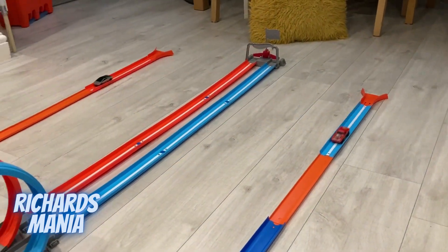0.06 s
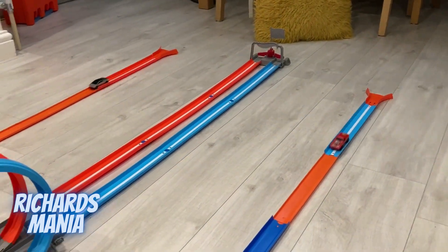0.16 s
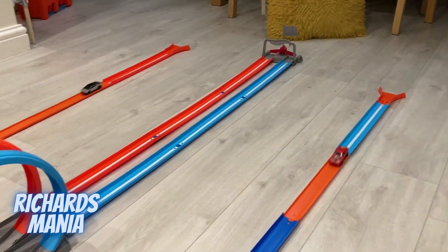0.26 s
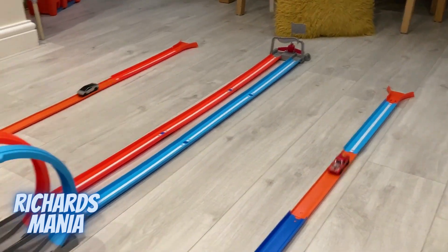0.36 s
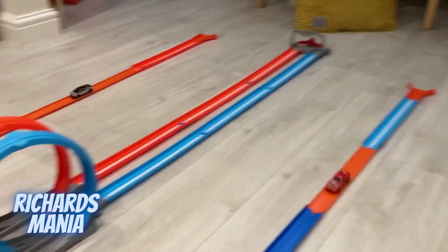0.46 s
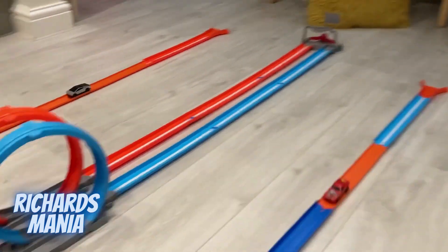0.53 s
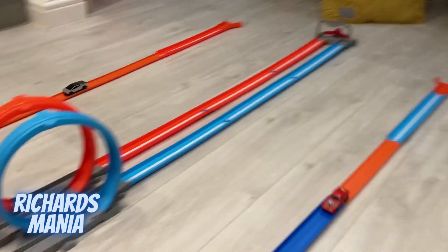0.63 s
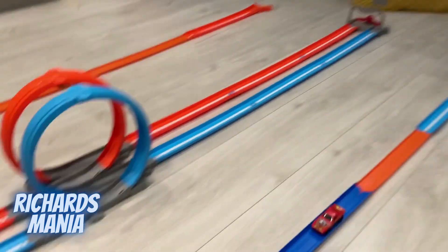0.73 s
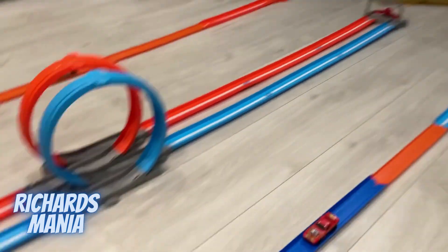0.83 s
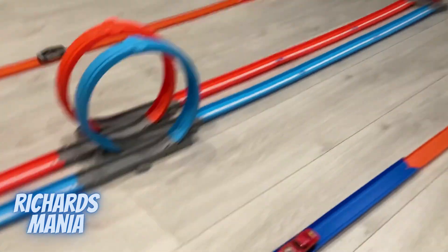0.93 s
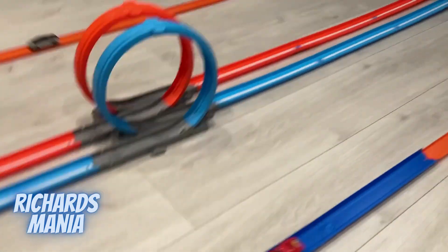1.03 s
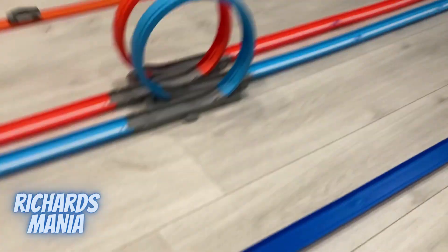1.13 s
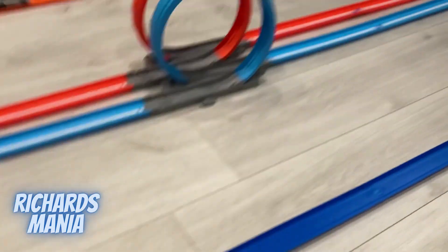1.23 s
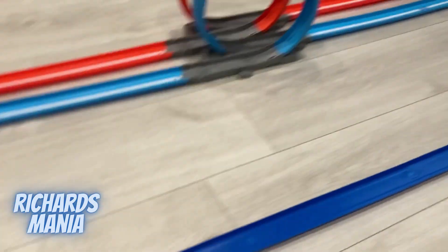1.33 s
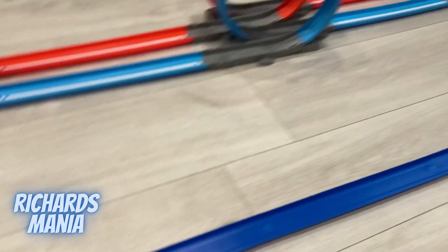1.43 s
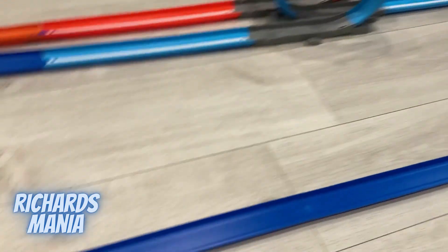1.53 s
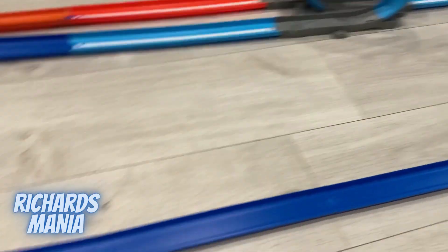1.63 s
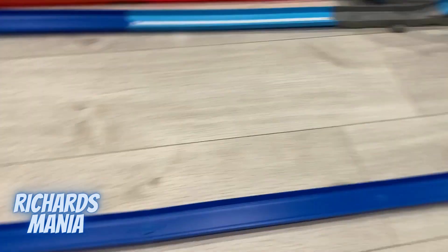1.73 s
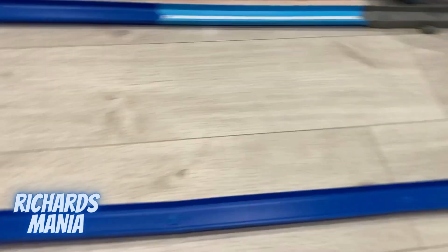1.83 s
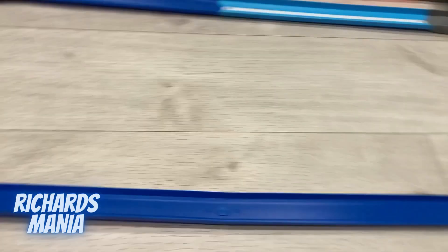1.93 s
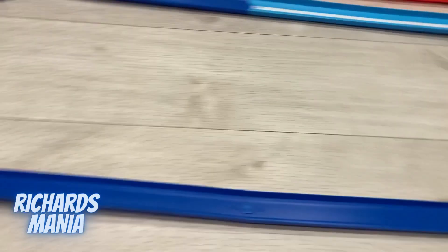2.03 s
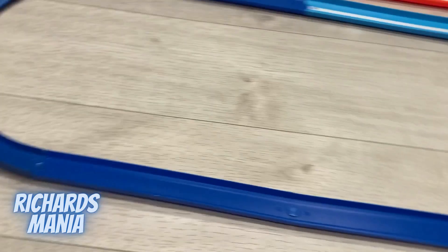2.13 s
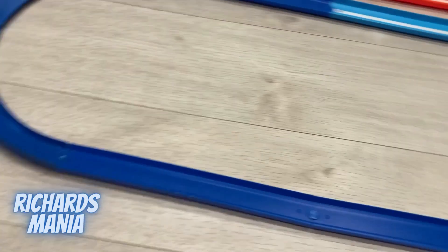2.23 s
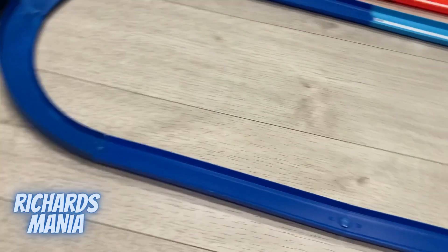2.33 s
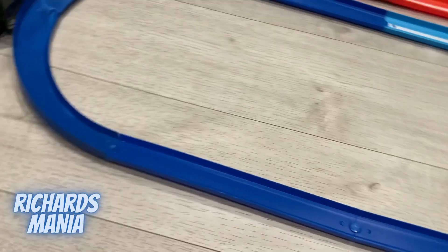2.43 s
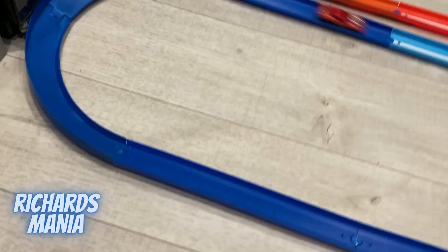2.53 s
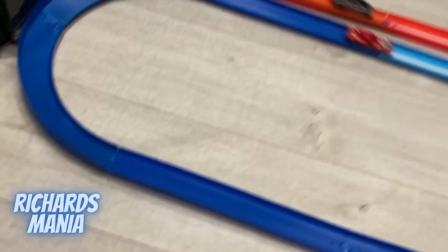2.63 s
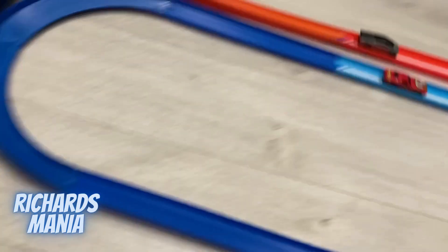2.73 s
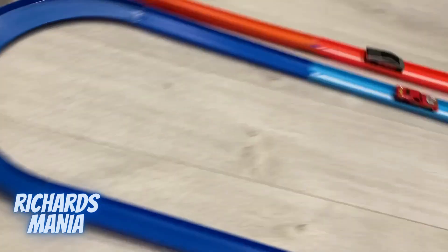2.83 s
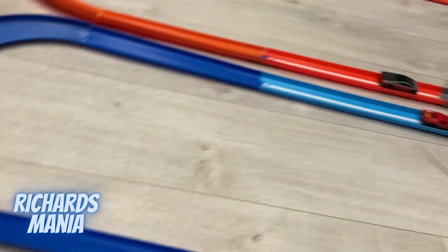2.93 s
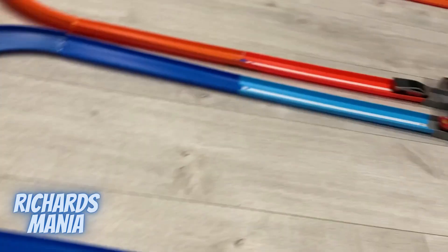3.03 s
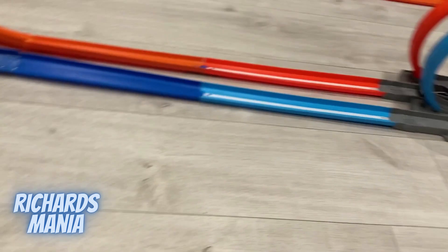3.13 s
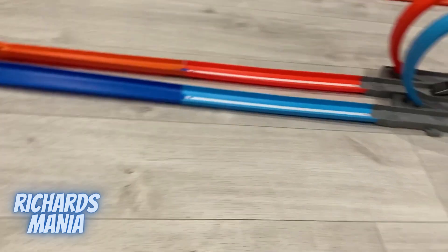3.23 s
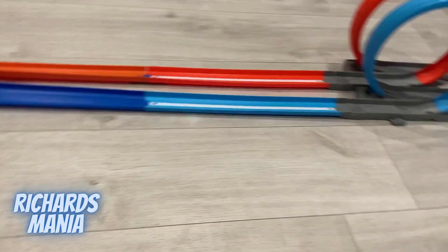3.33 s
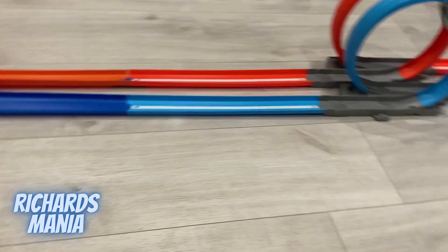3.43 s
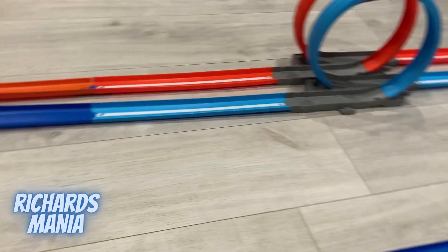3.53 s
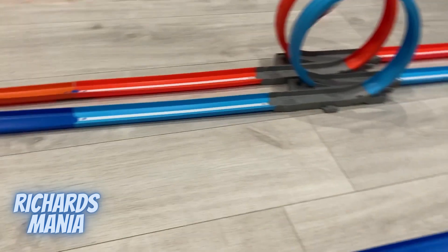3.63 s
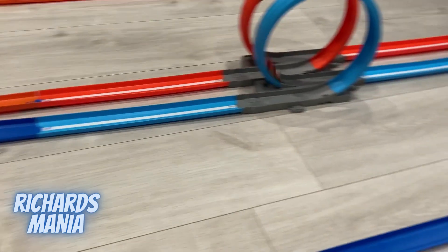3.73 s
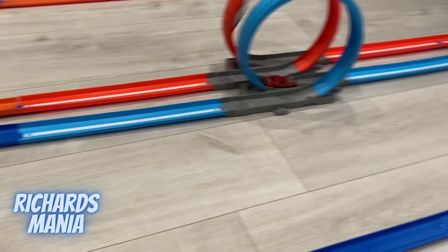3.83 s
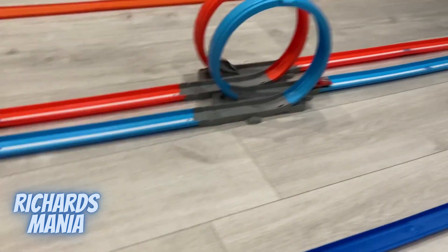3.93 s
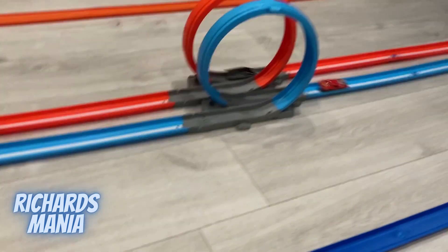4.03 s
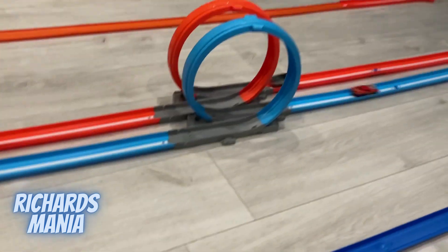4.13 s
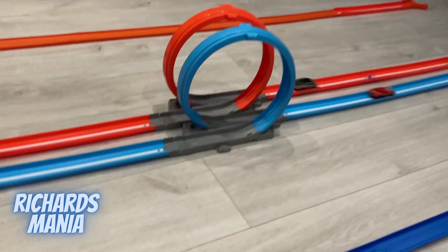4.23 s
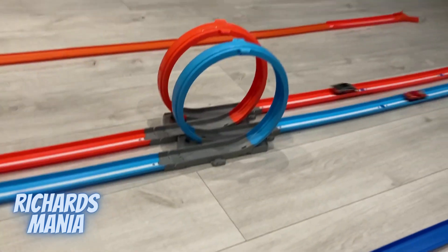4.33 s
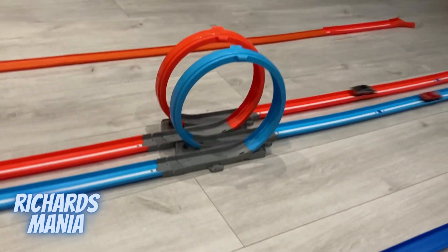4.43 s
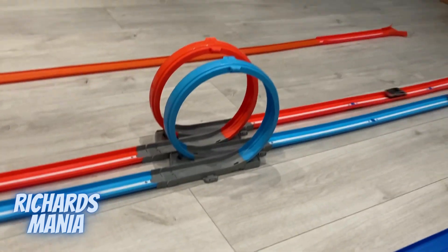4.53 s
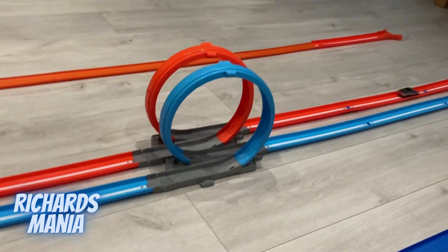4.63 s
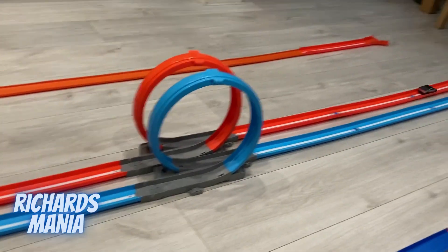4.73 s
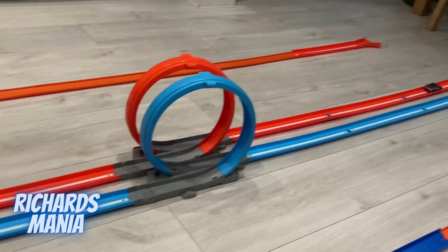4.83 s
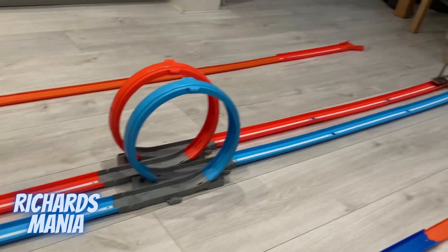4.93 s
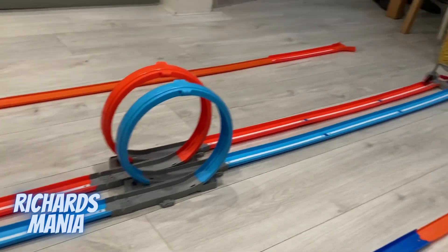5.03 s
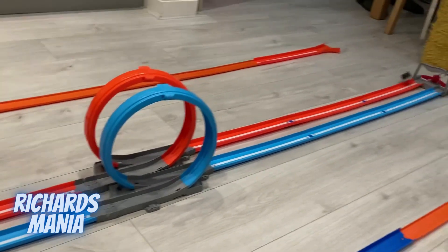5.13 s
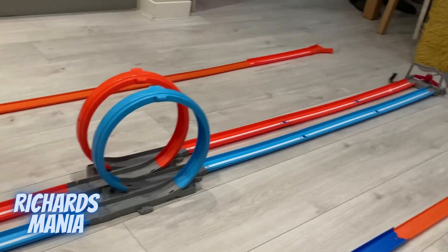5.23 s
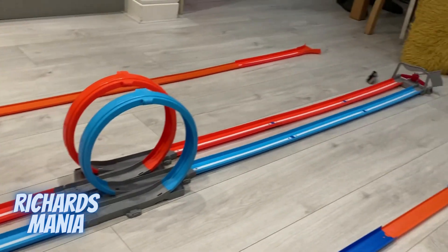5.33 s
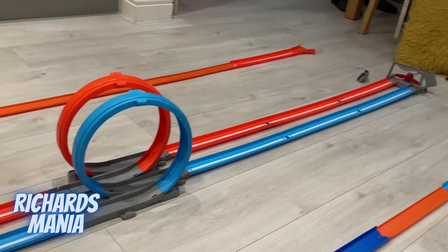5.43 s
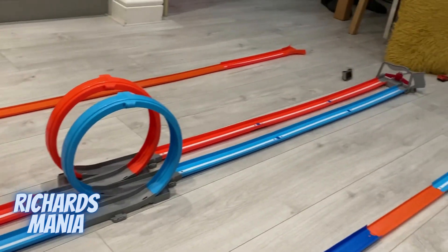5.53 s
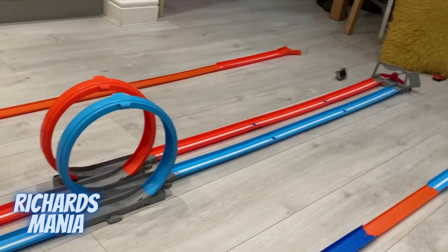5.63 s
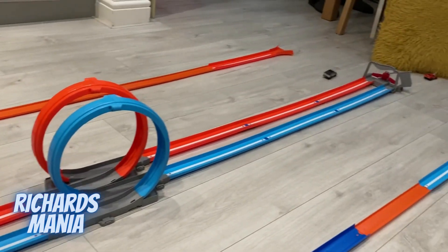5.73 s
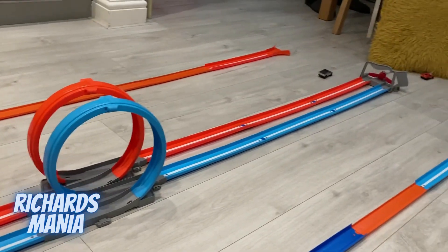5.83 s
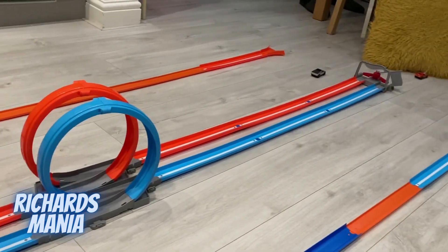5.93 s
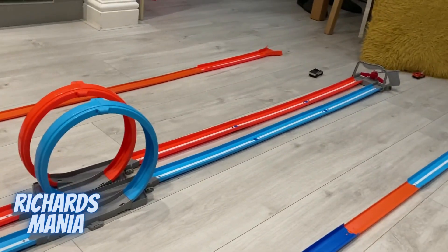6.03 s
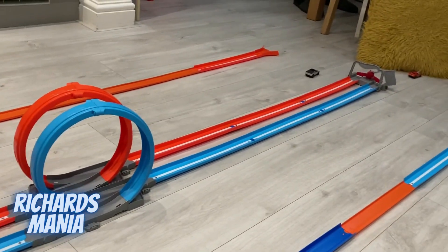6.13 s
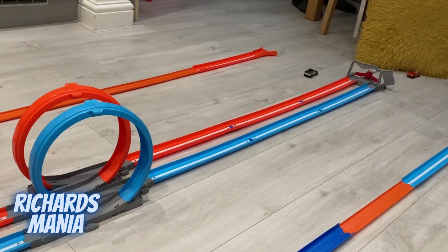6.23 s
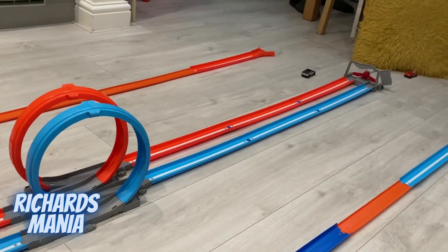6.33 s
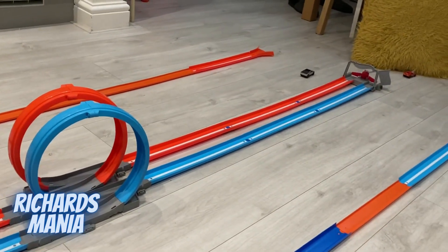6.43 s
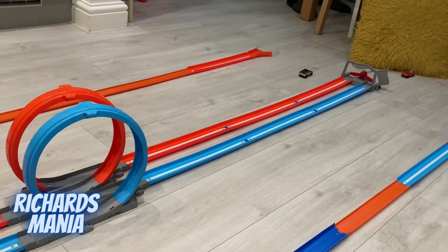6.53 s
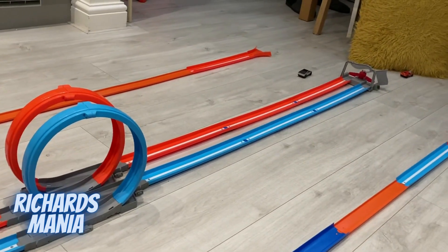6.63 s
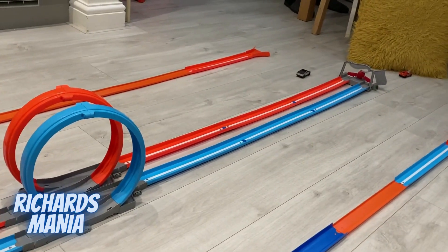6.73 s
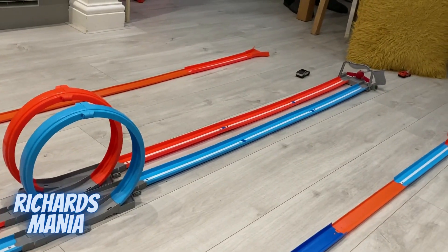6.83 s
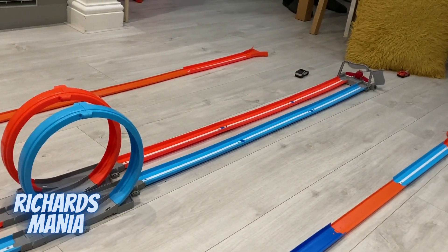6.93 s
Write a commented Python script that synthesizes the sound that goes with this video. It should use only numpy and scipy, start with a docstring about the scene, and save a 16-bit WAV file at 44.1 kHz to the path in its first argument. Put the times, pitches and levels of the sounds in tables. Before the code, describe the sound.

In a moderately echoing living room with a hard floor, two small metal toy cars run on plastic track. From 0 s a thin, gritty wheel rumble carries sharp joint clicks, near 0.25, 0.8 and 1.2 s. At about 1.7 s a car strikes and scrapes the bend's side rail, and the rolling gets fuller, with frequent clacks until 3 s. A dense burst of hollow plastic slaps and roar fills 3.1-3.3 s as the first car loops; a second comes at 3.8-4.1 s. Rattling continues, thinning, to two hard gate crashes at 4.86 and 4.98 s, with flap knocks and rebounds. One car tumbles, with knocks and a scuff at 5.1-5.5 s, then drops in a quick clatter at 5.8-5.95 s. The echo dies swiftly, leaving faint room hush to about 7 s. The close handheld stereo microphone adds slight low handling rumble.

```python
"""Hard wheels rumble along a plastic track and clack over its joints: two die-cast toy cars race indoors.
Each roars through a loop and crashes into the finish gate; one tumbles on, drops back on its wheels,
and the laminate-floored living room falls silent. Rolling is a stream of random taps and a knock is a
burst of contacts; both excite banks of damped resonances. Diffuse, decaying noise gives the echo, and
filtered noise the still room and the handling rumble."""
import sys
import numpy as np
from scipy import signal
from scipy.fft import rfft, irfft, next_fast_len
from scipy.io import wavfile

SR = 44100
rng = np.random.default_rng(int(sys.argv[2]) if len(sys.argv) > 2 else 0)


def file_out(sig):
    """Save sig as 16-bit WAV at sys.argv[1]."""
    # one column per channel
    cols = np.atleast_2d(sig).T
    # limit, then scale
    lim = np.clip(cols, -1, 1)
    pcm = np.round(lim * 32767).astype(np.int16)
    wavfile.write(sys.argv[1], SR, pcm)


N = 307377
TIME = np.arange(N) / SR

# Resonances: (frequency [Hz], bandwidth [Hz], level [dB])
FLOOR = [(72, 32, 1.5), (120, 38, 3), (156, 53, 2), (212, 78, -2.5), (287, 79, -5), (468, 55, -5)]
# track base: (frequency [Hz], bandwidth [Hz], level [dB])
BASE = [(501.5, 48, -4), (586.5, 56, 1.5), (673, 110, 0), (793, 104, 3), (963, 79, 3)]
# running strip: (frequency [Hz], bandwidth [Hz], level [dB])
STRIP = [(1013.6, 40, 5), (1100, 199, 5.5), (1215, 470, 1), (1540, 210, -5)]
# side rails: (frequency [Hz], bandwidth [Hz], level [dB])
RAILS = [(1718, 240, 1), (2048, 200, 3), (2186, 100, 4.5), (2320, 180, 2.5), (2565, 780, -3.5)]
# metal chassis: (frequency [Hz], bandwidth [Hz], level [dB])
CHASSIS = [(2975, 190, 0.63), (3490, 400, 3), (3676, 258, 5), (4100, 400, 2.8), (5202, 240, 6)]
# car sill: (frequency [Hz], bandwidth [Hz], level [dB])
SILL = [(3224, 290, -3), (3590, 640, 2), (3810, 240, 6)]
# axles: (frequency [Hz], bandwidth [Hz], level [dB])
AXLES = [(5164, 200, 4.5), (5760, 600, -2.5), (6377, 100, 7.5), (7130, 644, 1), (7553, 180, -2.5),
         (8530, 230, -2.5), (9497, 58, 6)]
# the hard contact itself: (frequency [Hz], bandwidth [Hz], level [dB])
CRACK = [(6900, 2700, 0.0076), (8600, 340, 0.0019)]
# hollow frame of the finish gate: (frequency [Hz], bandwidth [Hz], level [dB])
GATE_FRAME = [(129, 52, -4), (159, 28, 9.5), (240, 70, -8), (342.6, 68, -7.5)]
# swinging flap of the gate: (frequency [Hz], bandwidth [Hz], level [dB])
FLAP = [(518, 61, -3.5), (607, 18, 5.5), (766, 60, -3.5), (917, 77, 2), (1170, 41, -2)]

# Rolling strength before each part's exponent: (time [s], level [dB])
ROLL = [(0, -3), (.3, -5), (.55, -3.5), (.8, -2.5), (1.3, -0.7), (1.62, -1.5), (2.2, -0.5), (2.65, -1.5),
        (2.95, -1), (3.1, 1.5), (3.45, -2.5), (4.3, -2), (4.8, -3.5), (5.0, 0), (5.15, -7), (5.48, -6.5),
        (5.62, -16.5), (5.79, -14.5)]
# plain rolling in each part: part -> level [dB]
ROLL_DB = dict(floor=-50, base=-41.5, strip=-38.5, rails=-39, chassis=-36, axles=-32)
# how steeply each part follows the rolling strength: part -> exponent [1]
ROLL_EXPONENT = dict(floor=0.87, base=1, strip=0.97, rails=1.2, chassis=1.39, axles=1.3)

# Stretches of firmer pressing, each followed by its drive into the parts.
# wheels graze the side rails: (start [s], length [s], level [dB], extra level in the rails [dB])
GRAZES = [(1.26, 0.44, -1, -6.5), (1.822, 0.36, -2.5, -4), (3.68, .1, -3.5, 6.5), (4.857, 0.045, -8, 1.5)]
# part -> level [dB]
GRAZE_DB = dict(chassis=-38, rails=-35)
# cars come down the first straight: (start [s], length [s], level [dB])
STRAIGHTS = [(.25, .55, -6), (.85, .62, -7)]
# part -> level [dB]
STRAIGHT_DB = dict(floor=-50.5, strip=-38, rails=-39.5)
# a chassis scrapes along the rail of the bend: (start [s], length [s], level [dB])
SCRAPES = [(1.698, 0.062, -3), (1.765, 0.032, -1), (1.81, 0.098, -7.5)]
# part -> level [dB]
SCRAPE_DB = dict(rails=-33, sill=-34, axles=-29.5)
# the bend drums on the floor under each car: (start [s], length [s], level [dB])
BENDS = [(1.72, 0.44, -2.5), (2.1, 0.48, -7)]
# part -> level [dB]
BEND_DB = dict(floor=-42.5, base=-41, strip=-40.5, chassis=-44.5)
# loops roar: (start [s], length [s], level [dB], extra level in the strip [dB])
LOOPS = [(3.156, 0.12, -1.5, 2.5), (3.392, 0.51, -6, 1), (3.866, 0.19, -2.5, -0.5), (4.06, 0.27, -11, -3.5)]
# part -> level [dB]
LOOP_DB = dict(floor=-42, base=-30.5, rails=-31, chassis=-38)
# gate and flap shake after each car: (start [s], length [s], level [dB])
SHAKES = [(4.86, 0.13, -12), (4.985, .025, -11)]
# part -> level [dB]
SHAKE_DB = dict(floor=-42.5, base=-26.5, strip=-33, rails=-27.5, chassis=-28, axles=-33, flap=-25)
# the tumbling car scuffs along the floor: (start [s], length [s], level [dB])
SCUFFS = [(5.26, 0.11, 0)]
# part -> level [dB]
SCUFF_DB = dict(floor=-42.5, base=-50, chassis=-39)

# Knocks, each kind followed by its reach into the parts. Chatter times are stretched by each part's linger.
# wheels clack over joints: (time [s], level [dB], weight [dB], snap [dB])
JOINTS = [(.246, -1.5, 1, 1.5), (.804, -5, -8, 1), (.899, -14, -8, 2), (.964, -8.5, 11.5, -3),
          (1.173, -1, 2, 3.5), (1.222, -12, 5.5, 5), (1.284, -12, -4, 2), (1.381, -4, 1, -9),
          (1.506, -2.5, -15, 0.5), (1.657, -11, 1.5, 5), (1.907, -8.5, -4, 9), (1.942, 2.5, 1, -1),
          (2.025, -2, 2.5, 2), (2.049, -9.5, 4.5, 1.5), (2.18, -3, -4, -6), (2.241, -1.5, -1, 0.5),
          (2.391, -3.5, 6, -1), (2.449, -16.5, 7, 1), (2.492, -14, 9, -1.5), (2.55, -6.5, 6.5, -2),
          (2.584, 1, 1.5, -3.5), (2.746, -1.5, 2.5, -6), (2.799, -2.5, 6, -3), (2.885, 0.5, 3.5, -1.5),
          (2.964, -8.5, 5.5, 2), (3.026, 0.5, 0, 4.5), (4.127, -2, 4.5, 3.5), (4.157, -1, 4, -17),
          (4.286, -5.5, -5.5, 3.5), (4.52, -8, 13, 1.5)]
# part -> level [dB]
JOINT_DB = dict(floor=-21.5, base=-11.5, strip=-10.5, rails=-11, chassis=-7, axles=-0.5, crack=-12)
# a car's flank strikes the rail of the bend: (time [s], level [dB], weight [dB])
RAIL_HITS = [(1.71, 0, -4)]
# part -> level [dB]
RAIL_HIT_DB = dict(floor=-13, base=-22, strip=1.5, rails=-5, chassis=0.5, sill=4.5, axles=-6, crack=-3)
# cars slap the hollow foot of the loops: (time [s], level [dB], weight [dB], snap [dB], chatter [s])
SLAPS = [(3.080, 6, -0.5, -4, 0.0011), (3.122, 1.5, 1, -11.5, 0.0028), (3.145, -6.5, 11, -3.5, 0.0036),
         (3.163, 5.5, 2, 4, 0.0018), (3.175, 3, 8.5, -1, 0.0014), (3.194, -7.5, 11, 1, 0.0028),
         (3.213, -7, 8.5, 0, 0.00088), (3.235, -10, 7, 1, .002), (3.256, -8.5, 7.5, 5, 0.0018),
         (3.264, -4, 5, 3.5, 0.00079), (3.293, -6.5, 10.5, -1, .0015), (3.799, 3, 3.5, -2, 0.0015),
         (3.823, 9, -2.5, -6, 0.0025), (3.837, 3.5, -2.5, -2.5, 0.0014), (3.859, 4, 5.5, -2.5, 0.00057),
         (3.886, -3, 4.5, -2.5, 0.00092), (3.944, -14, 7, 0, 0.0016), (3.965, 0, 9, 1.5, 0.0044),
         (3.988, -10, 7.5, 1, 0.0024), (4.0, -2, 10.5, 1, 0.0026), (4.037, -0.5, 3.5, 8, 0.0028),
         (4.055, -10, 1, 1, 0.0053), (4.092, -6, 9, 0, 0.0036), (4.182, -14, 8.5, -2.5, 0.0015)]
# part -> level [dB]
SLAP_DB = dict(floor=-22.5, base=-4, strip=-6.5, rails=-8.5, chassis=-6, axles=-3, crack=-17)
# cars slam into the gate: (time [s], level [dB], weight [dB], snap [dB], chatter [s])
GATE_BLOWS = [(4.856, 1, -5, 3.5, 0.00029), (4.953, -9, -5.5, -6, .002), (4.982, 6, 1, -0.5, 0.0011),
              (4.986, -3.5, 9.5, -0.5, .0008), (4.991, -2, 6, 0.5, 0.00069), (4.997, -4.5, 0.5, 5, .0015)]
# part -> level [dB]
GATE_BLOW_DB = dict(floor=-17, base=0, strip=-5.5, rails=-5, chassis=0, axles=0, crack=-14.5, frame=-10, flap=-4.5)
# a car tumbles and drops on its wheels: (time [s], level [dB], weight [dB], snap [dB], chatter [s])
TUMBLES = [(5.132, -8, -6, -4, .002), (5.21, -17.5, 4, 2, .001), (5.257, -5.5, 5, -6, 0.0013),
           (5.282, -22, 14, 0, 0.0027), (5.326, -1.5, -6.5, 7, 0.0011), (5.342, -6, 1, 1, 0.0016),
           (5.41, -10.5, -1, 1, .001), (5.512, -9.5, 1.5, 7.5, 0.003), (5.52, -9.5, -2, 3.5, .001),
           (5.808, -0.5, -2.5, -2, 0.00024), (5.816, -1.5, -10, -2, 0.0016), (5.831, -8, 1, -10, 0.0014),
           (5.854, -9.5, -6, -3, 0.0023), (5.889, -7, -3, 1, 0.0016), (5.935, -9, -3.5, 3.5, 0.0011)]
# part -> level [dB]
TUMBLE_DB = dict(floor=-7.5, base=-8.5, strip=-12, rails=-7.5, chassis=-5, axles=-4.5, crack=-10.5)
# the second car bounces between the gate's posts: (time [s], level [dB])
REBOUNDS = [(5.003, -2.5), (5.011, -4), (5.020, -10.5), (5.033, -6)]
# part -> level [dB]
REBOUND_DB = dict(base=-3, strip=-4.5, rails=-1.5, chassis=-4, axles=-7.5)
# the gate rocks and thuds on the floor: (time [s], level [dB])
THUDS = [(5.031, 0.5), (5.26, -4), (5.335, -7.5), (5.347, 1), (5.369, -7.5)]
# part -> level [dB]
THUD_DB = dict(floor=-9, frame=-10.5)
# the flap swings against its stop: (time [s], level [dB])
FLAP_KNOCKS = [(5.029, 6.5), (5.285, 2.5), (5.335, 1), (5.482, 1.5), (5.497, -7.5), (5.52, -17)]
# part -> level [dB]
FLAP_KNOCK_DB = dict(flap=-7, strip=-9.5)
# glancing touches, each exciting one resonance: (time [s], frequency [Hz], level [dB], T60 [s])
PINGS = [(.802, 5680, -16.5, 0.022), (.900, 5850, -22, 0.016), (.965, 1600, -16, 0.02),
         (1.741, 5370, -16, 0.013), (1.777, 3680, -13, 0.026), (2.046, 2360, -19, 0.04),
         (2.391, 3820, -20, 0.014), (2.448, 1180, -17, 0.043), (2.549, 1250, -27, 0.028),
         (3.031, 1540, -17.5, 0.035), (3.031, 2820, -16, .025), (3.122, 3410, -14, .02),
         (3.8, 1950, -12.5, .016), (3.802, 2380, -9, 0.02), (3.824, 2176, -6, 0.034),
         (3.824, 3560, -14, .025)]

# Direct gain; values above zero lower the echo by as much again: (time [s], level [dB])
NEARNESS = [(0, 0), (2.9, 2), (3.08, 0), (3.4, 2), (3.7, -2), (3.82, 3), (4.05, 2), (4.4, 1), (4.85, 0.5),
            (5.0, 2), (5.15, 2), (5.35, 0.5), (6.97, -1)]
# reverberation time: (frequency [Hz], T60 [s])
ROOM_T60 = [(140, 0.27), (280, 0.67), (700, 0.71), (1800, 0.63), (4800, 0.62), (9500, 0.12)]
# echo against direct sound, before nearness: (frequency [Hz], level [dB])
ROOM_DB = [(60, -9), (250, 2.5), (700, 0), (2000, 5), (5000, -2), (9500, -3)]
# likeness of the echo at the two ports: (frequency [Hz], correlation [1])
LIKENESS = [(60, 0.77), (150, 0.099), (350, 0), (1000, 0.49), (3000, 0)]
# spectral shape of the still room: (frequency [Hz], relative level per Hz [dB])
QUIET = [(15, -33), (25, -8), (53, -0.5), (92, -9.5), (383, -16.5), (424, -19.5), (1810, -28.5),
         (4350, -31.5), (5590, -34), (9950, -45), (12900, -61), (21900, -120)]
# low handling rumble: (time [s], level [dB])
HANDLING = [(0, -52), (1.5, -48.5), (2.6, -53), (3.2, -55.5), (3.9, -45.5), (4.6, -49), (5.3, -44),
            (5.7, -64.5), (5.85, -57), (6.3, -83), (6.97, -84)]
# sensitivity of the left port over the right: (frequency [Hz], level [dB])
LEFT_DB = [(60, 0), (150, 0.5), (500, 1), (1000, 2), (2000, 1.5), (3000, -1.5)]

WHEEL_TURNS_PER_S = 48   # nominal; the rate drifts
SURGE_DB, SURGES_PER_S = 1.5, 17   # the wheels press now harder, now softer on the uneven track
SPOTS_PER_S = 11   # how often the cars reach a piece of track that rings differently
RATTLE_SHARE, LOOP_RATTLE_SHARE = .32, .55   # share of the rolling power in separate clacks
FINISH_S, OFF_TRACK_FADE_S, OFF_TRACK_DB = 5.06, .12, -5.5   # cars leave the track
JOINT_CHATTER_S, RAIL_CHATTER_S, GATE_CHATTER_S, THUD_CHATTER_S = 0.005, 0.0032, 0.0017, 0.0023
LOOP_STRIP_DB = -39.5
ECHO_BUILD_S, ECHO_END_S = .009, 0.58   # the last of the echo drops away quickly
QUIET_DB = -77
PORT_LAG_S, CUTOFF_HZ = .000438, 9850


def cars():
    """Forced vibration: rolling and knocks drive the floor, the track, the gate and the cars' own metal."""
    roll = roll_strengths()
    wheels = rattling(wheel_taps(per_s=1100, spread_db=2.0, wobble_db=5.0, turn_db=3))
    loose_axles = rattling(wheel_taps(per_s=1500, spread_db=2.5, wobble_db=3.5, turn_db=1.0))
    return (sounding("floor", FLOOR, roll["floor"] * wheels, linger=0.92, first=0.88, wander=0.063)
            + sounding("base", BASE, roll["base"] * wheels, linger=1.8, first=0.64, wander=0.043)
            + sounding("strip", STRIP, roll["strip"] * wheels, linger=1.0, first=0.91, wander=.045)
            + sounding("rails", RAILS, roll["rails"] * wheels, linger=3.5, first=1.0, wander=0.036)
            + sounding("chassis", CHASSIS, roll["chassis"] * loose_axles, linger=1.9, first=0.7, wander=0.036)
            + sounding("sill", SILL, roll["sill"] * loose_axles, linger=1.5, first=0.7, wander=0.031)
            + sounding("axles", AXLES, roll["axles"] * loose_axles, linger=3.8, first=0.45, wander=0.0065)
            + sounding("crack", CRACK, None, linger=0.9, first=0.36, wander=.02)
            + sounding("frame", GATE_FRAME, None, linger=1.9, first=0.95, wander=0.027)
            + sounding("flap", FLAP, roll["flap"] * wheels, linger=1.7, first=2.6, wander=0.0093)
            + pings())


def wheel_taps(per_s, spread_db, wobble_db, turn_db):
    """Random impulse excitation: many tiny taps, bunched once in each turn of a crooked wheel."""
    signs = rng.choice([-1, 1], N)
    sizes = from_db(spread_db * np.minimum(rng.exponential(1, N), 4)) * signs
    turns = np.cumsum(WHEEL_TURNS_PER_S * np.exp(.3 * drift(14))) / SR
    surge_db = SURGE_DB * np.tanh(drift(SURGES_PER_S))
    fast_wobble_db = wobble_db * np.tanh(drift(70))
    flurry_db = surge_db + fast_wobble_db + turn_db * np.cos(2 * np.pi * turns)
    tapped = rng.random(N) < per_s / SR
    return rms_one(sizes * tapped * from_db(flurry_db))


def rattling(taps):
    """Power sharing: part of the rolling comes as clacks of the loose bodies, most of all in the loops."""
    in_loop = np.minimum(pressing(without_extra(LOOPS), attack_s=.1, release_s=0.056), 1)
    share = RATTLE_SHARE + (LOOP_RATTLE_SHARE - RATTLE_SHARE) * in_loop
    clacks = wheel_taps(per_s=140, spread_db=1.5, wobble_db=1.5, turn_db=3)
    return np.sqrt(1 - share) * taps + np.sqrt(share) * clacks


def roll_strengths():
    """Power addition: plain rolling and the stretches of firmer pressing add as powers in each part."""
    roll, = in_time(ROLL)
    power = {part: (from_db(db) * roll ** ROLL_EXPONENT[part]) ** 2 for part, db in ROLL_DB.items()}
    on_track = from_db(OFF_TRACK_DB * np.clip((TIME - FINISH_S) / OFF_TRACK_FADE_S, 0, 1))
    for part in ("base", "strip"):
        power[part] = power[part] * on_track ** 2
    graze_chassis, graze_rails = dict(chassis=GRAZE_DB["chassis"]), dict(rails=GRAZE_DB["rails"])
    stretches = ((pressing(without_extra(GRAZES), attack_s=.07, release_s=0.035), graze_chassis),
                 (pressing(with_extra(GRAZES), attack_s=0.051, release_s=.02), graze_rails),
                 (pressing(STRAIGHTS, attack_s=0.03, release_s=0.21), STRAIGHT_DB),
                 (pressing(SCRAPES, attack_s=0.0068, release_s=0.012), SCRAPE_DB),
                 (pressing(BENDS, attack_s=0.059, release_s=0.093), BEND_DB),
                 (pressing(without_extra(LOOPS), attack_s=0.072, release_s=.06), LOOP_DB),
                 (pressing(with_extra(LOOPS), attack_s=0.057, release_s=.05), dict(strip=LOOP_STRIP_DB)),
                 (pressing(SHAKES, attack_s=0.0033, release_s=0.011), SHAKE_DB),
                 (pressing(SCUFFS, attack_s=0.067, release_s=0.024), SCUFF_DB))
    for swell, reach_db in stretches:
        for part, db in reach_db.items():
            power[part] = power.get(part, 0) + (from_db(db) * swell) ** 2
    return {part: np.sqrt(p) for part, p in power.items()}


def pressing(rows, attack_s, release_s):
    """Contact-force envelope: a linear rise from the start; exponential decay once the length has passed."""
    total = 0
    for s, length, db in rows:
        rise = np.clip((TIME - s) / attack_s, 0, 1)
        decay = np.exp(-np.maximum(TIME - s - length, 0) / release_s)
        total = total + from_db(db) * rise * decay
    return total


def without_extra(rows):
    """Common drive: the stretches at their base level."""
    return [row[:3] for row in rows]


def with_extra(rows):
    """Selective drive: the stretches with their extra level [dB] added."""
    return [(s, length, db + extra_db) for s, length, db, extra_db in rows]


def sounding(part, modes, rolling, linger, first, wander, count=5):
    """Convolution with a modal response that changes from spot to spot.
    Each knock is one sharp contact and a dying chatter of small rebounds."""
    answers = [answer(modes, wander) for _ in range(count)]
    out, t = np.zeros(N + SR), TIME[:SR // 20]
    if rolling is not None:
        spot = (TIME * SPOTS_PER_S).astype(int) % count
        for k, tone in enumerate(answers):
            out[:N] += signal.oaconvolve(rolling * (spot == k), tone)[:N]
    for k, (s, db, chatter_s) in enumerate(knocks_on(part)):
        contacts = rng.choice([-1, 1], len(t)) * (rng.random(len(t)) < 6000 / SR)
        rebounds = contacts * np.exp(-t / (linger * chatter_s))
        blow = rebounds / (np.linalg.norm(rebounds) + 1e-9)
        blow[0] += first * np.sqrt(0.00072 / chatter_s)   # a short knock is mostly its first contact
        knock = signal.fftconvolve(blow, answers[k % count])
        at = round(s * SR)
        out[at:at + len(knock)] += from_db(db) * knock / np.linalg.norm(knock)
    return out[:N]


def answer(modes, wander):
    """Modal superposition: damped cosines, each a little off its usual pitch, scaled to unit energy."""
    t = TIME[:SR // 8]
    shifts = 1 + wander * rng.uniform(-1.4, 1, len(modes))
    tone = 0
    for k, (hz, width, db) in enumerate(modes):
        ring = np.exp(-np.pi * width * t) * np.cos(2 * np.pi * hz * shifts[k] * t)
        tone = tone + from_db(db) * width * ring * (-1) ** k
    tone = butter(tone, [1.002 * modes[0][0], min(1.103 * modes[-1][0], .45 * SR)], "band")
    return tone / np.linalg.norm(tone)


def knocks_on(part):
    """Impact transmission: all knocks that reach one part, as (time [s], level [dB], chatter [s])."""
    kinds = ((JOINTS, JOINT_DB, JOINT_CHATTER_S), (RAIL_HITS, RAIL_HIT_DB, RAIL_CHATTER_S),
             (SLAPS, SLAP_DB, None), (GATE_BLOWS, GATE_BLOW_DB, None), (TUMBLES, TUMBLE_DB, None),
             (REBOUNDS, REBOUND_DB, GATE_CHATTER_S), (THUDS, THUD_DB, THUD_CHATTER_S),
             (FLAP_KNOCKS, FLAP_KNOCK_DB, GATE_CHATTER_S))
    felt = []
    for rows, reach_db, usual_s in kinds:
        if part in reach_db:
            for row in rows:
                s, db, chatter_s = as_felt(part, *row)
                felt.append((s, db + reach_db[part], chatter_s or usual_s))
    return felt


def as_felt(part, s, db, weight_db=0, snap_db=0, chatter_s=None):
    """Force division: weight drives track, floor and gate; snap drives the axles and the hard contact."""
    if part in ("axles", "crack"):
        extra_db = snap_db
    elif part in ("chassis", "sill"):
        extra_db = 0
    else:
        extra_db = weight_db
    return s, db + extra_db, chatter_s


def pings():
    """Free decay of a single mode: short ringing tones of a car's shell or a rail."""
    out, t = np.zeros(N), TIME[:SR // 10]
    onset = 1 - np.exp(-t / .0007)
    for s, hz, db, t60 in PINGS:
        at = round(s * SR)
        out[at:at + len(t)] += from_db(db - 60 * t / t60) * np.sin(2 * np.pi * hz * t) * onset
    return out


def room(x, count=8, size=8192):
    """Time-varying reverberation: as cars and microphone move, short overlapping stretches of sound
    meet different echo patterns in rotation."""
    patterns = [echoes() for _ in range(count)]
    out, padded = np.zeros((2, N + 2 * SR)), np.pad(x, size)
    window = np.sin(np.pi * np.arange(size) / size)   # squared windows sum to one at half overlap
    for k, at in enumerate(range(0, N + size, size // 2)):
        stretch = padded[at:at + size] * window
        wet = signal.fftconvolve(stretch[None], patterns[k % count], axes=1)
        out[:, at:at + wet.shape[1]] += wet
    return out[:, size:size + N]


def echoes():
    """Diffuse-field decay: the room's answer at two ports for one position, dying band by band."""
    t, echo = TIME[:SR * 3 // 4], 0
    edges = np.geomspace(40, 12000, 11)
    white = rng.standard_normal((2, 2, len(t)))   # neighbouring bands get unrelated noise
    for k, (low, high) in enumerate(zip(edges, edges[1:])):
        hz = np.sqrt(low * high)
        mid, side = butter(white[k % 2], [low, high], "band", order=3)
        alike, t60 = np.clip(at_hz(LIKENESS, hz), -1, 1), at_hz(ROOM_T60, hz)
        build = 1 - np.exp(-t / ECHO_BUILD_S)
        fade = from_db(-60 * t / t60) * build / (1 + (t / ECHO_END_S) ** 10)
        pair = np.sqrt((1 + alike) / 2) * mid + np.sqrt((1 - alike) / 2) * side * [[1], [-1]]
        echo = echo + from_db(at_hz(ROOM_DB, hz)) * pair * fade / np.linalg.norm(fade)
    return echo


def background():
    """Filtered noise: a faint still room, and a low rumble while the microphone is carried after the cars."""
    hz = np.fft.rfftfreq(N, 1 / SR)
    spectrum = rfft(rng.standard_normal((2, N))) * from_db(at_hz(QUIET, hz))
    quiet = rms_one(irfft(spectrum, N))
    carried, = in_time(HANDLING)
    mid, side = rms_one(butter(rng.standard_normal((2, N)), [24, 56], "band"))
    rumble = mid + from_db(-11.5) * side * [[1], [-1]]
    return from_db(QUIET_DB) * quiet + carried * rumble


def from_db(db):
    """Decibel law: amplitude ratio of a level."""
    return 10 ** (np.asarray(db) / 20)


def rms_one(x):
    """Power normalization to an RMS of one."""
    return x / np.sqrt(np.mean(x ** 2) + 1e-20)


def at_hz(points, hz):
    """Logarithmic pitch scale: interpolate a table on a log-frequency axis."""
    table = np.array(points)
    return np.interp(np.log(hz + 1e-3), np.log(table[:, 0]), table[:, 1])


def in_time(rows):
    """Level interpolation: gain curves from (time [s], level [dB], ..), -120 dB after the last row."""
    s, *columns = np.transpose(rows)
    return [from_db(np.interp(TIME, s, c, right=-120)) for c in columns]


def butter(x, hz, kind, order=2):
    """Maximally flat filtering."""
    return signal.sosfilt(signal.butter(order, hz, kind, fs=SR, output="sos"), x)


def drift(per_s):
    """Slow random fluctuation: straight lines between chance values, RMS one."""
    knots = rng.standard_normal(4000)
    return rms_one(np.interp(TIME * per_s, np.arange(len(knots)), knots))


def scene():
    """Superposition of direct sound, reverberation and background at two ports."""
    near, = in_time(NEARNESS)
    race = cars()
    direct = race * near
    # the race runs mostly to the right, so it reaches the left port a little later
    left = np.interp(TIME - .0003, TIME, direct)
    return np.array([left, direct]) + room(race / np.maximum(near, 1)) + background()


def record(dry):
    """Coherent phase spread: above about 3 kHz the left port takes mostly an inverted, slightly delayed copy of
    the right, then a top narrowed to near mono, soft saturation of peaks and a steep low-pass."""
    size = next_fast_len(N + SR // 10)
    hz = np.fft.rfftfreq(size, 1 / SR)
    # half of the sensitivity difference goes to each port
    ports = rfft(dry, size) * from_db(at_hz(LEFT_DB, hz) * [[.5], [-.5]])
    delayed = -ports[1] * np.exp(-2j * np.pi * hz * PORT_LAG_S)
    share = .96 / (1 + (3150 / (hz + 1)) ** 24)   # power share of the delayed right port in the left
    left = np.sqrt(1 - share) * ports[0] + np.sqrt(share) * delayed
    width = at_hz([(5500, 1), (5900, 0.18)], hz)
    mid, side = (left + ports[1]) / 2, width * (left - ports[1]) / 2
    out = irfft(np.array([mid + side, mid - side]), size)[:, :N]
    out = .8 * np.tanh(out / .8)
    return signal.sosfilt(signal.ellip(10, .5, 75, CUTOFF_HZ, fs=SR, output="sos"), out)


dry = scene()
out = record(dry)
file_out(out)
```